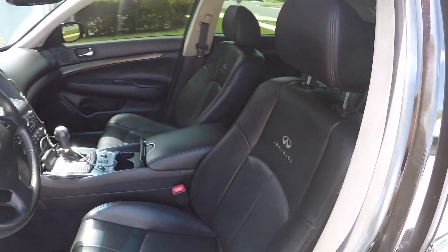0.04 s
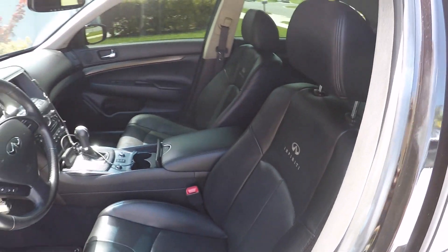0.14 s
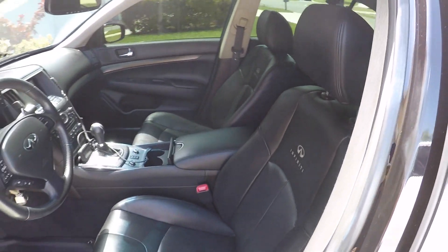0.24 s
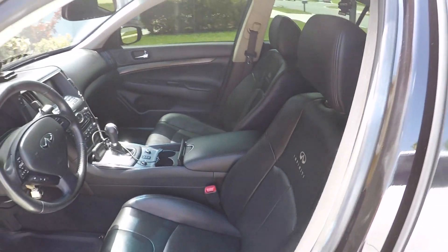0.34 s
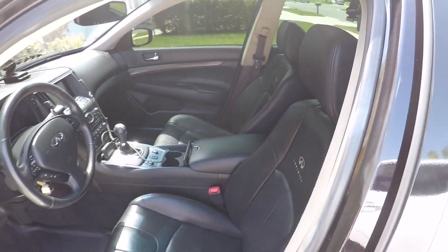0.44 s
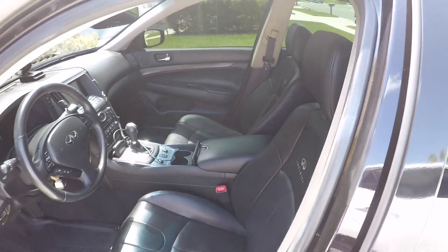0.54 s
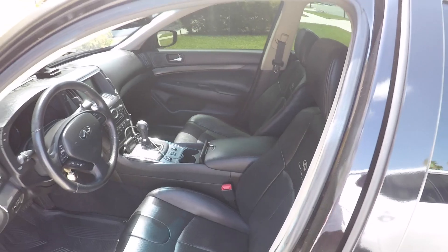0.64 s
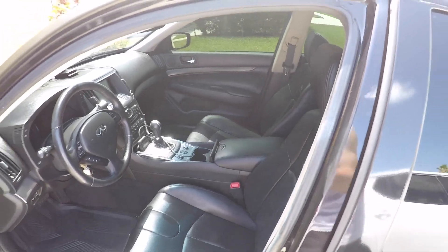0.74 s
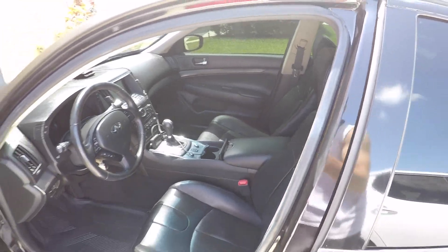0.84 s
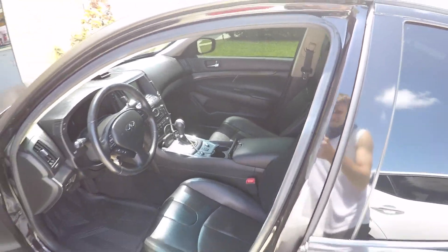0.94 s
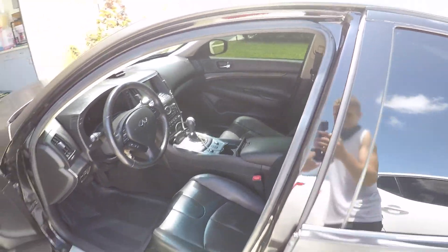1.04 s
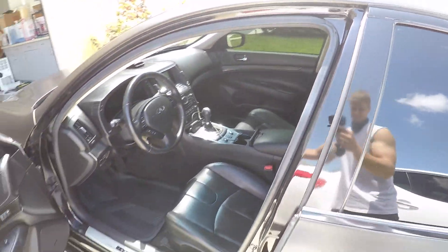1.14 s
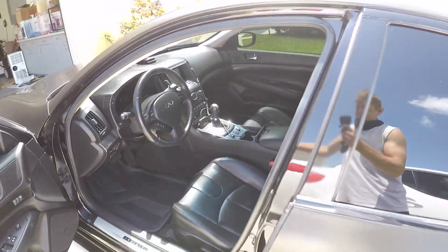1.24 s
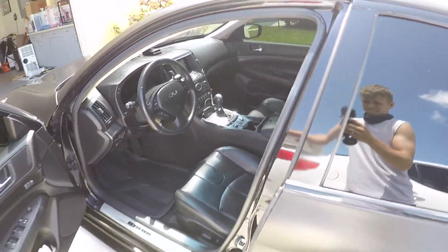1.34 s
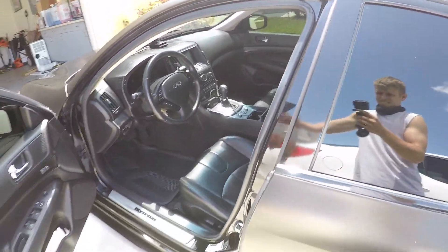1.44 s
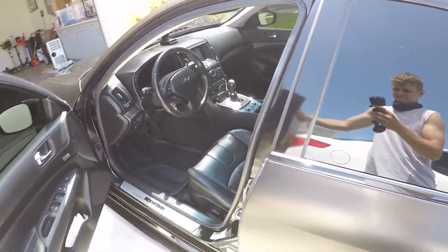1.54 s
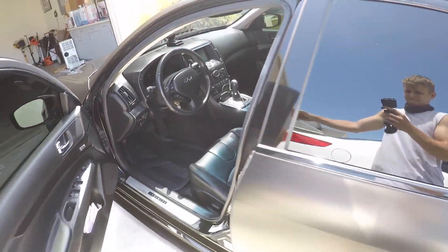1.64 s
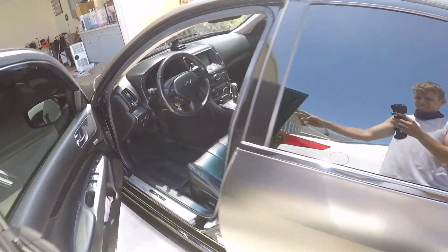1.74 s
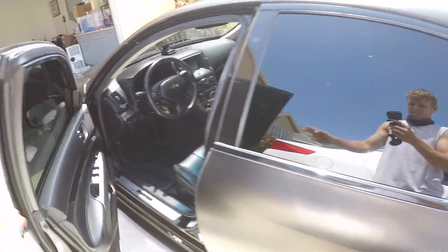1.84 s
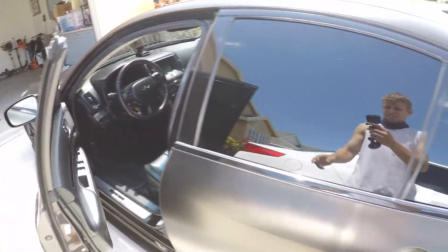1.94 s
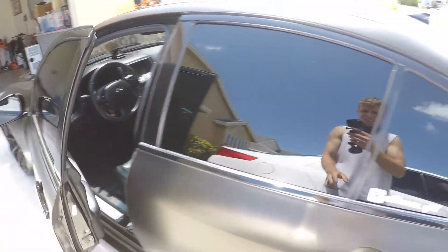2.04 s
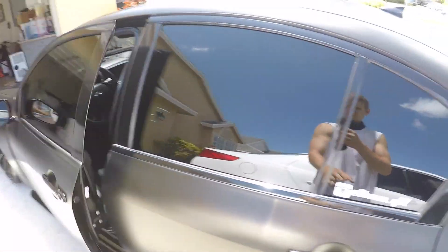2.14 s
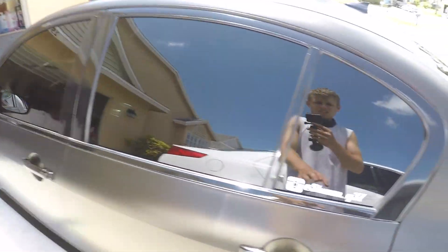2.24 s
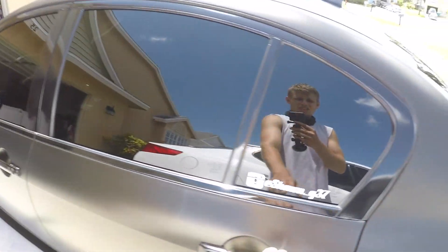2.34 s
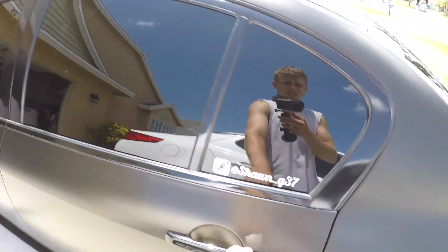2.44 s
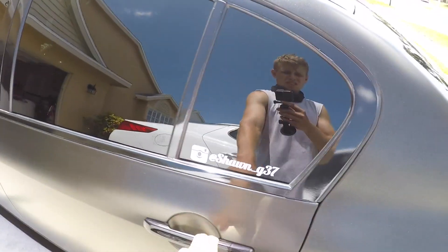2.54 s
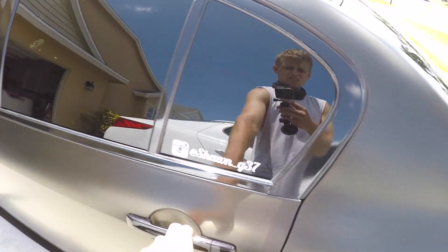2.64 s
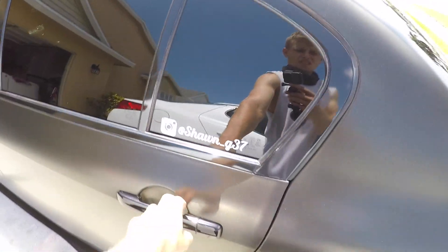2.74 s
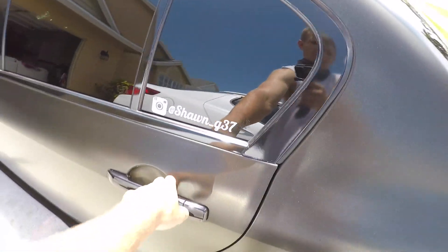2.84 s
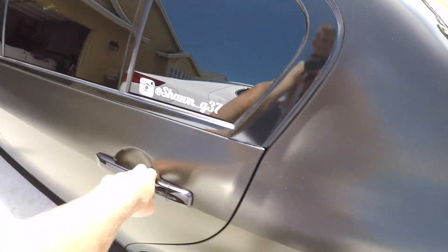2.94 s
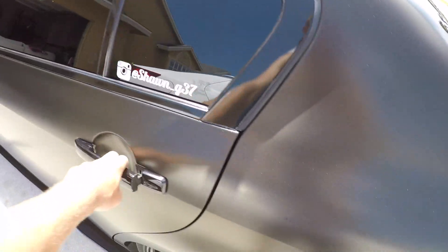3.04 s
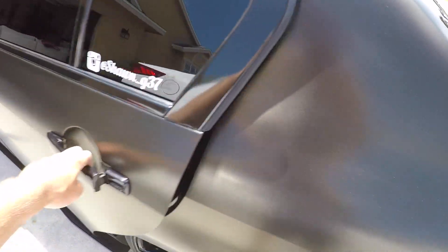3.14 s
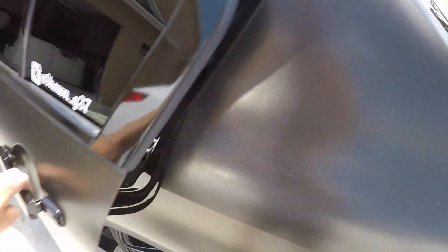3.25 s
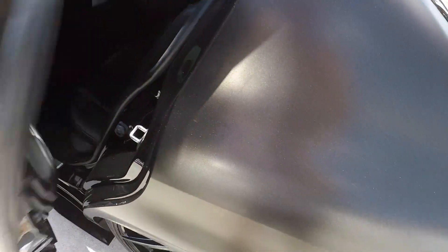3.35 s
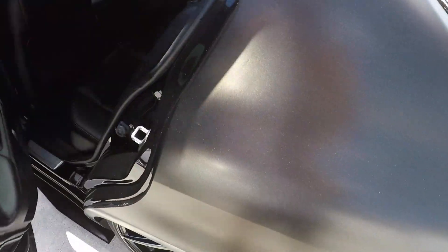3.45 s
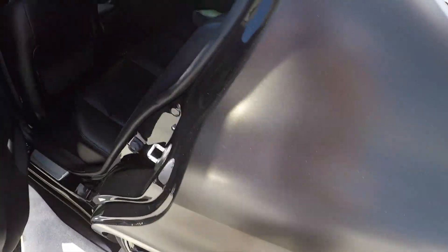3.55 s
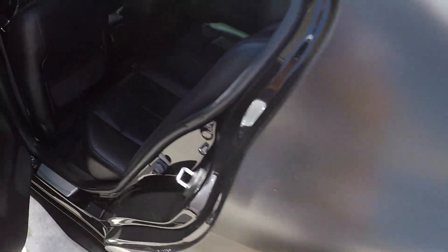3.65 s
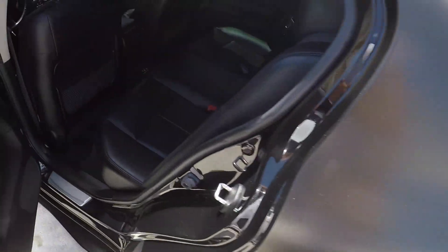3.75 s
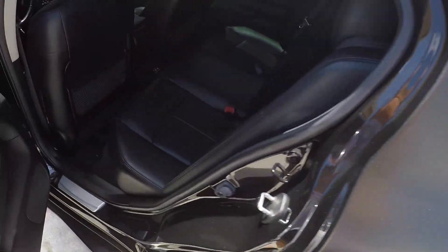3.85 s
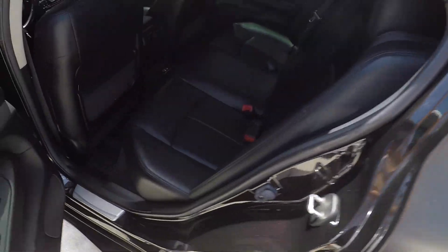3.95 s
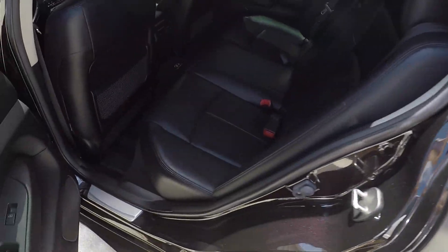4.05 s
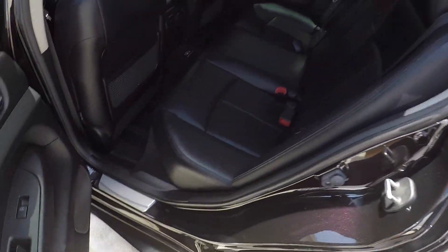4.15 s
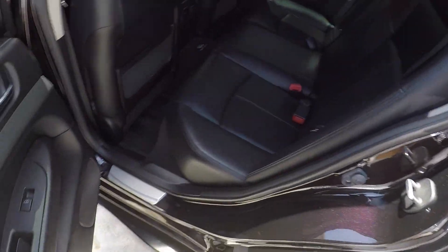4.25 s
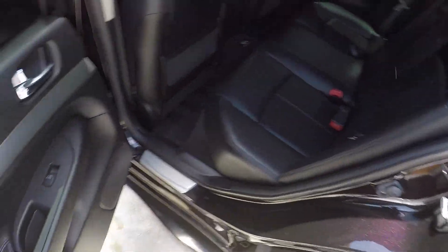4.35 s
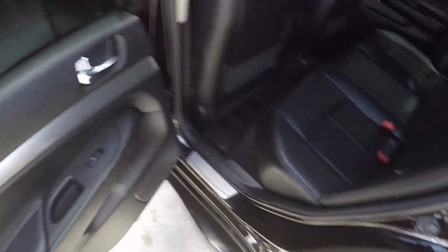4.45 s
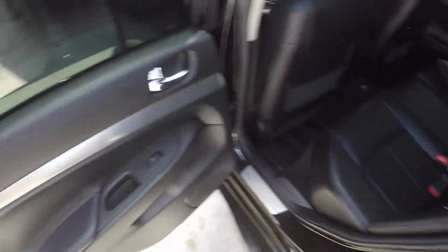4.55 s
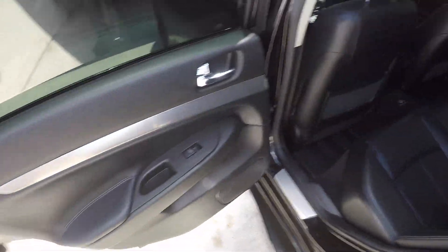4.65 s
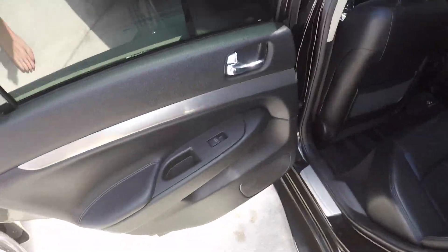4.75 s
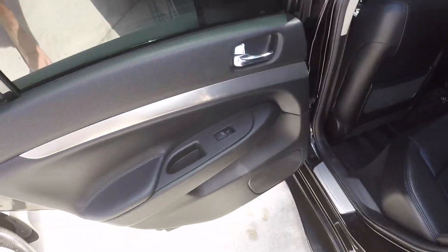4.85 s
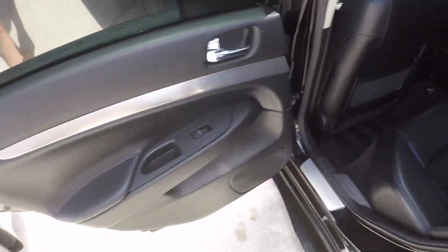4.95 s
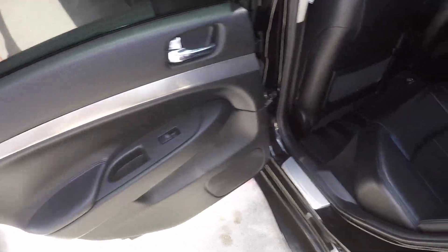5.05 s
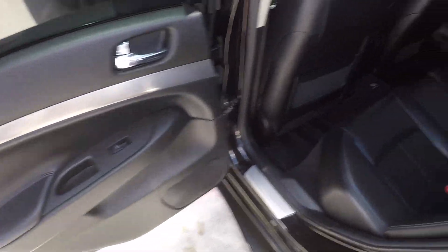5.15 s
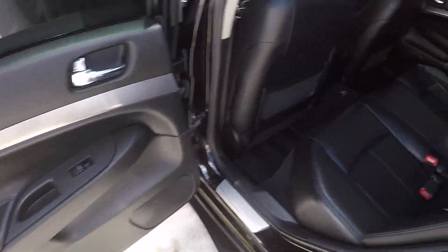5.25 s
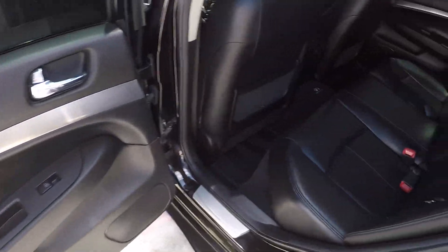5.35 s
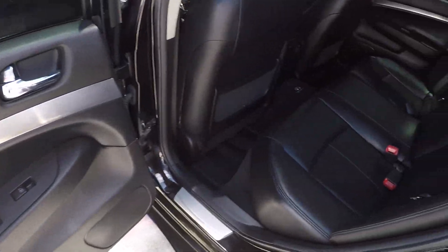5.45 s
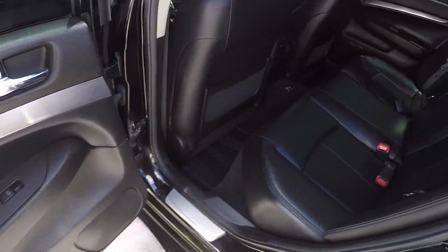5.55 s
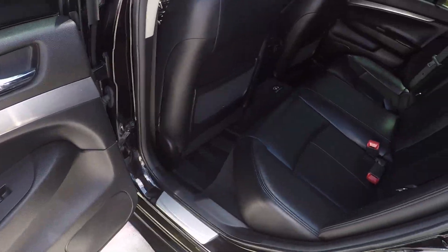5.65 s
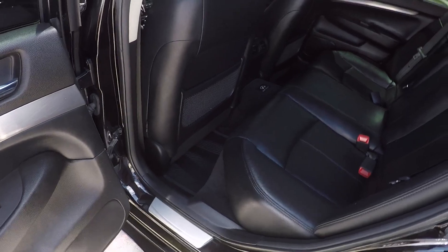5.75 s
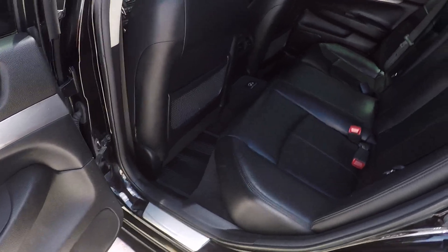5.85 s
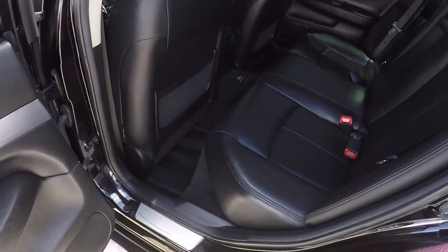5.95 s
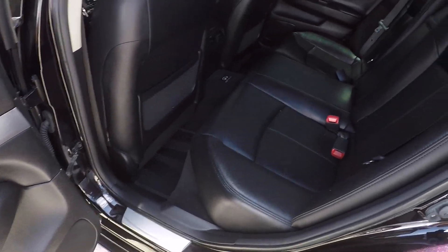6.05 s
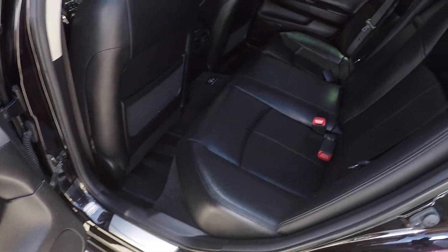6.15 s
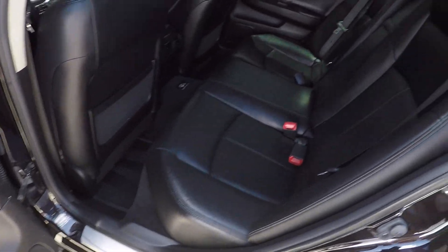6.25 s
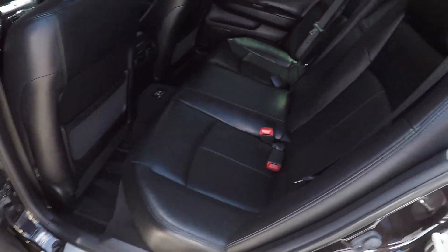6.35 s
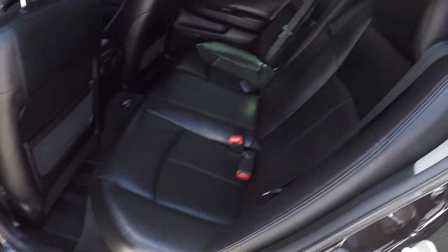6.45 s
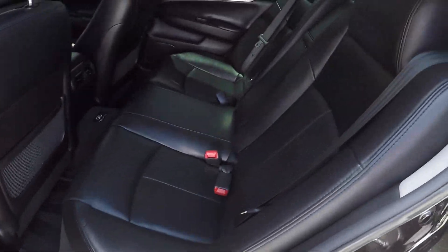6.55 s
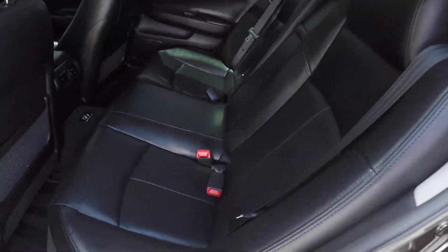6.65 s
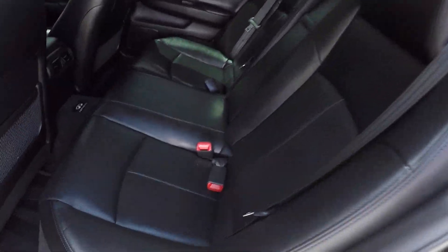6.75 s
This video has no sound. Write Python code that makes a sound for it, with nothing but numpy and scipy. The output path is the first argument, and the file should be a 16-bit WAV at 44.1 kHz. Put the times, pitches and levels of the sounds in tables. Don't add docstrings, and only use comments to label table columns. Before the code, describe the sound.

Gusty low rumble beside a parked car, one heavy door slam, a handle and latch clack, a second door swinging open, then small ticks.

```python
import sys
import numpy as np
from scipy import signal
from scipy.fft import rfft, irfft
from scipy.io import wavfile
from scipy.ndimage import uniform_filter1d

SR = 44100
rng = np.random.default_rng(int(sys.argv[2]) if len(sys.argv) > 2 else 0)


def persist_wave(psi):
    counts = np.round(np.clip(psi, -1, 1) * 32767).astype(np.int16)
    wavfile.write(sys.argv[1], SR, np.atleast_2d(counts).T)


def ratio_of_db(decibels):
    return 10 ** (np.asarray(decibels, float) / 20)


N = 299880
T = np.arange(N) / SR
HZ = np.arange(1, N // 2 + 2) * SR / N
SIDES = np.array([[1], [-1]])


def band(x, lo_hz, hi_hz, order=4):
    return signal.sosfilt(signal.butter(order, [lo_hz, min(hi_hz, .45 * SR)], "band", fs=SR, output="sos"), x)


def unit(x):
    return x / np.sqrt(np.mean(x ** 2))


def decay(t, t60):
    return np.exp(-np.log(1000) * t / t60)


def walk(rate):
    hold = int(SR / rate)
    steps = np.repeat(rng.standard_normal(N // hold + 1), hold)
    return 1.38 * uniform_filter1d(uniform_filter1d(steps, hold), hold)[:N]


def at(table, hz):
    f, v = np.transpose(table)
    return np.interp(np.log(hz), np.log(f), v)


def pair(like, count=N):
    like = np.clip(like, 0, 1)
    mid, side = rng.standard_normal((2, count))
    return np.sqrt((1 + like) / 2) * mid + np.sqrt((1 - like) / 2) * side * SIDES


def noise(like, gain):
    return irfft(rfft(pair(like)) * gain, N)


def ring(push, hz, t60):
    pole = np.exp(2j * np.pi * hz / SR - np.log(1000) / (max(t60, .002) * SR))
    return signal.lfilter([1], [1, -pole], push).imag


def tone(hz, wander_hz, db):
    level = ratio_of_db(db + 0.83 * walk(3.6))
    return level * np.sin(2 * np.pi * np.cumsum(hz + wander_hz * walk(15)) / SR)


def add(out, x, s):
    i = int(s * SR)
    n = min(x.shape[-1], N - i)
    out[:, i:i + n] += x[..., :n]


# start_s, peak_db, upper_body_db (relative), rattle_ms, ring_scale
DOOR_BLOWS = [
    (2.357, -5, -4.5, 8, 1.04),
    (2.48, -29.5, -4, 87, 2.2),
    (3.104, -16.5, -27, 39, 0.72),
    (3.138, -17.5, -7, 6.3, 0.69),
    (3.174, -10, -5.5, 10, 0.88),
    (3.644, -5.5, -3.5, 34, 0.66),
    (3.69, -18.5, -17.5, 26, 1.64),
]
# pitch_hz, level_db, t60_s
DOOR_SKINS = [
    [(149.2, 1, 0.43), (294, -18, 0.8), (349, -4, 0.43), (406, -16, 1.6), (439, -3, 0.13), (550, -11, 0.44),
     (601, -20, 0.59), (705, -3, 0.013), (719, 0.5, 0.066), (804, -19.5, 0.25), (860, -22, 0.12)],
    [(149, -5, 0.37), (186, -2.5, 0.31), (221, -21, 0.13), (282, -9.5, 0.11), (352, 4.5, 0.074),
     (430, -28, 0.25), (524, -3, 0.11), (676, -11, 5.0), (845, -47, 5.0), (1050, -29, 0.22)],
    [(194, -11, 0.7), (260, -3, 0.072), (354, 0, 0.81), (436, -32, 0.096), (543, -19.5, 0.36),
     (576, -9, 0.48), (670, -11.5, 0.4), (770, -32, 0.71), (980, -35.5, 0.67), (905, -32, 0.31),
     (980, -26, 0.23), (1022, -19, 0.55)],
]
# pitch_hz, t60_s
BODY_RING = [(150, 0.56), (300, 0.32), (700, 0.27), (1500, 0.14), (3000, 0.15), (8000, 0.12)]


def blows():
    out, t = np.zeros((2, N)), T[:SR // 2]
    for s, db, upper_db, rattle_ms, scale in DOOR_BLOWS:
        panel = DOOR_SKINS[(s > 3) + (s > 3.5)]
        rattle = rng.standard_normal(len(t)) * np.exp(-t / (rattle_ms / 3000))
        force = band(rattle, 170, 1050)
        skin = sum(ratio_of_db(g) * ring(force, f, min(t60, .28) * scale) for f, g, t60 in panel)
        hit = ratio_of_db(-7.5) * skin / np.abs(skin).max() * np.ones((2, 1))
        lumps = ratio_of_db(0.83 * np.interp(t, t[::600], rng.standard_normal(len(t[::600]))))
        sheen_db = -30 + 1.4 * db
        body = ((178, 461, -11, 0.99), (472, 915, upper_db - 16, 0.92),
                (1020, 2060, upper_db - 34.5, 0.74), (2220, 4000, sheen_db, 1))
        for lo_hz, hi_hz, rel_db, like in body:
            t60 = scale * at(BODY_RING, np.sqrt(lo_hz * hi_hz))
            fall = lumps * np.minimum(t / 0.00043, 1) * decay(t, t60)
            tail = band(pair(like, count=len(t)) * fall, lo_hz, hi_hz)
            hit = hit + ratio_of_db(rel_db) * tail * np.sqrt(SR / 2 / (hi_hz - lo_hz))
        add(out, ratio_of_db(db) * hit, s)
    return out


# start_s, peak_db, pitch_hz, t60_s
DOOR_KNOCKS = [(2.351, -26, 944, 0.023), (2.354, -23, 821, 0.13), (2.36, -15.5, 438, 0.048),
               (2.366, -17.5, 306.5, 0.099), (2.365, -22, 610, 0.06), (2.375, -16.5, 220, 0.11),
               (2.39, -30.5, 814, 0.085), (2.395, -33.5, 319, 0.1), (2.415, -25.5, 438, 0.088),
               (2.42, -31.5, 617, 0.099), (2.5, -37.5, 408, .4), (2.505, -40, 633, 0.19),
               (3.105, -28.5, 356, 0.16), (3.11, -34, 533.7, 0.32), (3.132, -37.5, 840, 0.048),
               (3.14, -33, 390, 0.1), (3.169, -20, 375, .1), (3.171, -21.5, 623, 0.07),
               (3.174, -32.5, 830, 0.083), (3.176, -33, 1480, 0.047), (3.204, -21.5, 162.5, .15),
               (3.215, -33, 664, 0.2), (3.25, -36, 650, 0.17), (3.58, -26.5, 340, 0.084),
               (3.643, -23, 960, 0.028), (3.643, -29.5, 1240, .05), (3.646, -13.5, 268.2, 0.18),
               (3.648, -17.5, 385, 0.053), (3.644, -20.5, 538, 0.047), (3.66, -17, 339, 0.059),
               (3.661, -33.5, 956, 0.066), (3.665, -22, 703, 0.063), (3.667, -14.5, 276, 0.1),
               (3.687, -27, 180, 0.11), (3.7, -22.5, 665, 0.16), (3.71, -29, 667, 0.08),
               (3.718, -34, 349, 0.58), (3.745, -36, 682, 0.26)]


def knocks():
    out, t = np.zeros((2, N)), T[:SR // 3]
    rise_s, buzz_rad, spread_rad = .003, 0.29, 0.11
    for s, db, hz, t60 in DOOR_KNOCKS:
        shake = unit(band(rng.standard_normal((2, len(t))), 15, 120, order=2))
        swell = (1 - np.exp(-t / rise_s)) ** 2 * decay(t, t60)
        phase = 2 * np.pi * hz * t + buzz_rad * shake[0] + spread_rad * shake[1] * SIDES
        add(out, ratio_of_db(db) * swell / swell.max() * np.sin(phase), s)
    return out


# pitch_hz, width_hz, level_db
LATCH_PARTS = [(1570, 110, 7), (2140, 310, 10), (2570, 300, -13), (3570, 160, 5.5), (4600, 91, 3),
               (5600, 97, -13), (6450, 400, -1), (7300, 380, 3.5)]
# start_s, clack_db, knock_db, click_db, sizzle_db
LATCH_CLACKS = [(2.344, -44, -52, -62, -62), (2.352, -36, -48, -45, -57), (2.3565, -26, -25, -32, -40),
                (2.3615, -28, -31, -37, -43), (2.3665, -35, -43, -37, -43), (2.3735, -44, -48, -47, -51),
                (2.3794, -39, -51, -46, -51), (2.389, -47, -55, -53, -50), (2.3974, -48, -54, -53, -56),
                (2.407, -48, -62, -60, -62), (3.1365, -40, -50, -54, -59), (3.1405, -44, -52, -56, -61),
                (3.17, -36, -43, -57, -58), (3.1748, -20, -34, -44, -47), (3.184, -44, -60, -64, -60),
                (3.1935, -41, -47, -57, -50), (3.211, -42, -56, -65, -70), (3.633, -38, -41, -51, -68),
                (3.638, -31, -38, -43, -45), (3.6435, -20, -26, -42, -30), (3.6485, -27, -30, -34, -32),
                (3.6543, -40, -49, -39, -50), (3.662, -33, -43, -52, -48), (3.669, -31, -53, -47, -57),
                (3.676, -36, -57, -56, -56), (3.689, -42, -55, -61, -63)]
# low_hz, high_hz
LATCH_BANDS = ((900, 1750), (1750, 2550), (3050, 4600), (4600, 8800))
LATCH_BALANCE = (1.2, 1.5, -1.5, -.5)
LATCH_LIFT = (0, 1, .5, 3.5)


def latch():
    out, t = np.zeros((2, N)), T[:SR // 10]
    touch_s, scrape_s, ring_share = .0012, .0032, .6
    for s, *levels in LATCH_CLACKS:
        force = pair(0.64, count=len(t)) * np.minimum(t / touch_s, 1) * np.exp(-t / scrape_s)
        parts = sum(ratio_of_db(g) * w / 3500 * ring(force, f, 1.8 / w) for f, w, g in LATCH_PARTS)
        steel = force + ring_share * parts
        for (lo_hz, hi_hz), left_db, db in zip(LATCH_BANDS, LATCH_BALANCE, np.add(levels, LATCH_LIFT)):
            part = band(steel, lo_hz, hi_hz, order=3)
            level = ratio_of_db(db + left_db / 2 * SIDES)
            add(out, level * part / np.abs(part.mean(axis=0)).max(), s)
    out = signal.sosfilt(signal.butter(6, 10000, fs=SR, output="sos"), out)
    return np.array([out[0], np.roll(out[1], 3)])


# start_s, knock_db, knock_hz, click_db, air_db
TRIM_TICKS = [(1.2114, -60, 2750, -70, -70), (2.3155, -40, 1450, -50, -62), (2.318, -43, 1450, -53, -62),
              (2.8834, -72, 1400, -76, -69), (2.9455, -48, 1550, -61, -72), (2.951, -56, 1700, -63, -72),
              (2.9935, -62, 1400, -68, -73), (2.997, -66, 1500, -69, -75), (3.0465, -54, 1350, -55, -62),
              (3.0574, -50, 1350, -57, -68), (3.1118, -50, 1400, -58, -66), (3.4141, -48, 1900, -55, -62),
              (3.8821, -56, 2800, -70, -65), (4.0532, -60, 1650, -67, -74), (4.0731, -72, 2000, -51, -59),
              (4.1094, -60, 1400, -70, -70), (4.4064, -54, 1550, -78, -72), (4.4528, -50, 1600, -64, -70),
              (4.6555, -55, 1900, -56, -64), (4.6585, -43, 1350, -62, -61), (4.664, -54, 1500, -65, -67),
              (5.2146, -40, 2250, -44, -54), (5.2204, -54, 1900, -54, -66), (6.5814, -50, 1700, -50, -52),
              (6.584, -39, 1450, -54, -54)]
TICK_EDGES = (2800, 4400, 6500)
TICK_LIFT = (1.5, 3.5, 1)


def ticks():
    out, t = np.zeros((2, N)), T[:SR // 5]
    for s, knock_db, hz, click_db, air_db in TRIM_TICKS:
        force = pair(0.6, count=len(t)) * np.exp(-t / .002) + 2.5 * (t < 1 / SR)
        force = force + ratio_of_db(-18) * ring(force, 3600, .02)
        parts = ((knock_db, hz / 1.35, hz * 1.35), (click_db, *TICK_EDGES[:2]), (air_db, *TICK_EDGES[1:]))
        for (db, lo_hz, hi_hz), lift_db in zip(parts, TICK_LIFT):
            tick = band(force, lo_hz, hi_hz, order=2)
            add(out, ratio_of_db(db + lift_db) * tick / np.abs(tick.mean(axis=0)).max(), s)
    return out


# start_s, peak_db, pitch_hz, t60_s
CASE_THUMPS = [(0.361, -30, 330, 0.045), (0.863, -29, 430, 0.04), (0.915, -22.5, 328, 0.062),
               (0.966, -23.5, 270, 0.045), (1.206, -29, 340, .045), (1.245, -26.5, 240, 0.08),
               (1.361, -25.5, 325, 0.04), (1.485, -29.5, 320, 0.045), (1.535, -25.5, 270, 0.075),
               (1.566, -29, 270, 0.056), (1.599, -28, 288, 0.045), (2.944, -41, 650, 0.032),
               (3.046, -31.5, 363, 0.064), (3.088, -33.5, 400, 0.053), (3.497, -37, 420, 0.063),
               (3.573, -37, 480, 0.067), (3.621, -29, 430, 0.049), (3.988, -46, 420, .045),
               (4.012, -30.5, 230, 0.072), (4.107, -30.5, 333, 0.037), (4.216, -43, 230, 0.055),
               (4.273, -34, 230, 0.037), (4.613, -43, 450, 0.049), (5.038, -37.5, 450, 0.041),
               (5.286, -36, 460, 0.045), (5.31, -41, 480, 0.038), (5.799, -40, 460, 0.045),
               (5.892, -36, 460, 0.052), (6.027, -41, 460, .045), (6.74, -36, 460, 0.072)]


def thumps():
    out, t = np.zeros((2, N)), T[:SR // 5]
    for s, db, hz, t60 in CASE_THUMPS:
        force = pair(0.89, count=len(t)) * 0.42 * t * decay(t, t60) + .01 * (t < 1 / SR)
        thump = band(force, .55 * hz, 1.9 * hz)
        add(out, ratio_of_db(db) * thump / np.abs(thump).max(), s)
    return out


# middle_s, length_s, level_db, pitch_hz,
# width_hz
HISS_PUFFS = [(0.398, 0.04, -58, 5870, 3900), (2.525, 0.045, -73, 3400, 900),
              (2.515, .025, -76, 5150, 400), (3.647, .009, -39, 2800, 600), (3.177, .004, -58, 2800, 600),
              (2.347, .01, -36, 750, 500), (3.035, .008, -68, 3950, 400), (2.385, .04, -63.5, 6000, 3000),
              (2.333, 0.051, -61.5, 3500, 3000), (3.107, .05, -77, 3500, 3000),
              (3.146, 0.034, -63.5, 3500, 1500), (3.336, .08, -58, 600, 400),
              (3.414, 0.044, -53, 600, 400), (4.367, 0.013, -56, 1100, 700),
              (4.113, 0.054, -69.5, 5000, 4970), (4.321, .035, -62, 6500, 2500),
              (4.323, 0.044, -61, 3000, 3800), (4.656, 0.031, -65, 3950, 5100)]


def scuffs():
    out, t = np.zeros((2, N)), T[:SR // 5]
    for s, length, db, hz, width_hz in HISS_PUFFS:
        puff = np.exp(-((t - .1) / (length / 2)) ** 2)
        hiss = band(pair(0.37, count=len(t)), max(hz - width_hz / 2, 300), hz + width_hz / 2, order=2)
        add(out, ratio_of_db(db) * puff * unit(hiss), s - .1)
    return out


# start_s, level_db, t60_s
HIGH_PINGS = [(.498, -56, .06), (.785, -75, 0.062), (0.817, -54.5, .16), (4.04, -72, 0.046),
              (4.17, -75, 0.091)]


def pings():
    out, t = np.zeros((2, N)), T[:SR // 5]
    for s, db, t60 in HIGH_PINGS:
        ping = ring(t < 1 / SR, 12003, t60) * np.minimum(t / .003, 1)
        add(out, ratio_of_db(db) * ping * np.ones((2, 1)), s)
    return out


# time_s, level_db
GAIN_CONTROL = [(0.0, -62.5), (0.49, -62.5), (0.68, -61), (0.95, -66), (1.32, -71.5), (1.84, -70),
                (2.35, -66), (2.43, -76.5), (2.61, -81), (2.93, -78.5), (3.27, -75.5), (3.54, -73),
                (3.82, -77), (4.07, -76.5), (5.13, -67.5), (5.55, -64), (6.36, -63.5), (6.8, -64)]


def gain_db():
    return np.interp(T, *np.transpose(GAIN_CONTROL)) + 65


def eddy_split(db, small_db):
    large_db = db + 10 * np.log10(1 - np.clip(ratio_of_db(2 * small_db), 0, .9))
    flutter_db = db - 8.5 + 1.74 * small_db
    return ratio_of_db(np.array([large_db, db + small_db, flutter_db]))[:, None] ** 2


# start_s, length_s, level_db, small_eddies_db (relative)
WIND_GUSTS = [(0.132, 0.031, -19.5, -3.5), (0.323, 0.042, -26, -2), (0.426, 0.043, -26, -13),
              (0.52, 0.029, -24, -5.5), (0.562, 0.12, -23, -15), (0.714, 0.076, -16.5, -6.5),
              (0.852, 0.15, -16, -5.5), (1.114, 0.24, -19.5, -4.5), (1.355, 0.057, -19, -4),
              (1.427, 0.21, -18.5, -3.5), (1.729, 0.072, -20, -29), (1.892, 0.15, -18, -14),
              (2.171, 0.29, -18.5, -4), (2.65, 0.061, -22, -7.5), (2.735, 0.055, -24, -23),
              (3.177, 0.03, -14, -5.5), (3.5, 0.095, -18.5, -6), (3.618, 0.031, -19, 1),
              (3.655, 0.11, -22, -6.5), (3.842, 0.07, -17.5, -4), (4.008, 0.052, -17.5, -3.5),
              (4.077, 0.069, -21, -5), (4.2, 0.091, -19.5, -3.5), (4.321, 0.045, -19.5, -6),
              (5.038, 0.12, -20.5, -9), (5.174, 0.049, -21, -4), (5.356, 0.032, -21.5, -2.5),
              (5.64, 0.051, -30, 2)]
WIND_PUFFS = [(.91, 0.092, -27.5, 5), (1.47, 0.12, -29.5, 8.5), (3.29, 0.042, -21.5, -7),
              (3.455, 0.027, -27, -14), (4.531, 0.026, -21.5, -7), (4.7, 0.016, -19, -10.5),
              (4.82, 0.051, -23, -5), (6.0, 0.035, -25.5, -2.5), (6.14, 0.05, -31, 3),
              (6.38, 0.11, -28, -2), (6.59, 0.033, -39, -4)]


def eddy_power():
    power = eddy_split(-26, -3.5) * ratio_of_db(2 * 0.61 * gain_db())
    edge_s = 0.011
    for s, length, db, small_db in list(WIND_GUSTS) + list(WIND_PUFFS):
        t = T[:int((length + 2 * edge_s) * SR)]
        edges = np.clip(np.minimum(t, t[-1] - t) / (2 * edge_s), 0, 1) ** 2
        add(power, eddy_split(db, small_db) * edges, s - edge_s)
    return power


def wind():
    gust, out = walk(18), 0
    # low_hz, high_hz, shake_db, likeness
    sizes = ((14, 55, .6, .998), (55, 110, 1.5, .995), (110, 230, 2.5, .985))
    for power, (lo_hz, hi_hz, shake_db, like) in zip(eddy_power(), sizes):
        eddy = noise(like, 1 / np.sqrt((1 + (lo_hz / HZ) ** 6) * (1 + (HZ / hi_hz) ** 8)))
        swell = uniform_filter1d(eddy[0] ** 2, int(2.5 * SR / hi_hz)) + 1e-12
        out = out + unit(eddy / swell ** 0.3 * ratio_of_db(shake_db * gust)) * np.sqrt(power)
    end_pulse = ratio_of_db(-17) * np.exp(-((T - 6.8) / .004) ** 2)
    return 0.43 * np.tanh(out / 0.46) + end_pulse


# pitch_hz, likeness (0-1)
AIR_LIKENESS = [(200, 0.79), (700, 1), (1300, 0.22), (3000, 0.3), (7000, 0.04)]


def spread(table, flicker_db):
    out, octave, colour = 0, np.log2(HZ), ratio_of_db(at(table, HZ))
    for mid in np.arange(np.log2(table[1][0]), np.log2(table[-1][0]), 2 / 3):
        share = np.cos(np.pi / 2 * np.clip((octave - mid) * 3 / 2, -1, 1))
        out = out + noise(at(AIR_LIKENESS, 2 ** mid), colour * share) * ratio_of_db(flicker_db * walk(9))
    return unit(out)


def yard_echo():
    echo = 0
    for s, db, *_ in DOOR_BLOWS:
        echo = echo + ratio_of_db(db) * np.clip((T - s) / 0.011, 0, 1) * decay(np.abs(T - s), 0.48)
    return echo


# pitch_hz, level_db (per Hz)
TRAFFIC_WASH = [(150, -34), (210, -3), (290, -10.5), (380, 0), (480, -3), (650, -2.5), (780, -9.5),
                (950, -15.5), (1150, -22), (1700, -55)]
TYRE_SHELF = [(800, -26.5), (1100, -1), (1500, -0.5), (2000, -4.5), (2250, -9), (2600, -17.5), (3600, -45)]
LEAF_HISS = [(1530, -32.5), (2600, -5), (3900, -2), (4070, -5), (4590, -4), (6680, -1.5), (11400, -15.5),
             (12400, -16.5), (14200, -15)]
# time_s, level_db (over the wash)
MAINS_HUM = [(0, -5), (.75, -5), (1.0, -14), (1.6, -12), (1.75, -6), (2.3, -6), (2.6, -16), (6.8, -18)]
# pitch_hz, wander_hz, level_db (over the hiss)
INSECT_LINES = [(4077, 7, -16), (4136, 8, -14)]


def air():
    gain, echo = gain_db(), yard_echo()
    wash = spread(TRAFFIC_WASH, 1.57) + tone(240, 1.36, np.interp(T, *np.transpose(MAINS_HUM)))
    hiss = spread(LEAF_HISS, 0.86) + sum(tone(*line) for line in INSECT_LINES)
    shelf = spread(TYRE_SHELF, 0.65)
    wash_level = np.hypot(ratio_of_db(-41 + 0.87 * gain), ratio_of_db(-26) * echo)
    shelf_level = np.hypot(ratio_of_db(-59.5 + 0.89 * gain), ratio_of_db(-43.5) * echo)
    return wash * wash_level + hiss * ratio_of_db(-61 + gain) + shelf * shelf_level


# time_s, pitch_hz, level_db
MOTOR_NOTES = [
    [(2.4, 394.9, -42.5), (2.764, 399.7, -66.5), (2.802, 364.9, -66), (3.03, 365.2, -60.5),
     (3.088, 356.3, -46), (3.1, 356.8, -44)],
    [(5.02, 364, -60), (5.144, 375.5, -49.5), (5.318, 365.3, -53), (5.402, 371.6, -43), (5.46, 370, -53)],
]


def drone():
    out = 0
    for part in MOTOR_NOTES:
        s, hz, db = np.transpose(part)
        fade = np.clip(np.minimum(T - s[0], s[-1] - T) / 0.028, 0, 1)
        hz = np.interp(T, s, hz) + 4 * walk(18)
        out = out + fade * ratio_of_db(np.interp(T, s, db) + 9) * np.sin(2 * np.pi * np.cumsum(hz) / SR)
    return out


def scene():
    car = blows() + knocks() + latch()
    handling = ticks() + thumps() + scuffs() + pings()
    return car + handling + wind() + air() + drone()


def band_limit(x):
    return signal.sosfilt(signal.butter(12, 14320, fs=SR, output="sos"), x)


def record(dry):
    low = signal.sosfilt(signal.butter(1, 1500, fs=SR, output="sos"), dry)
    wet = dry + low * (ratio_of_db(1.77 * SIDES / 2) - 1)
    top = .52
    mix = top * np.tanh(wet / top) + .0008
    return band_limit(mix)


dry = scene()
out = record(dry)
persist_wave(out)
```